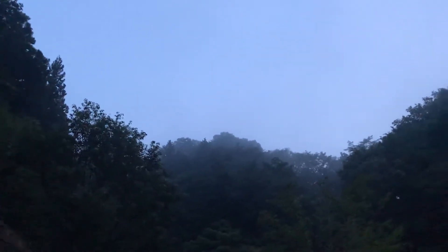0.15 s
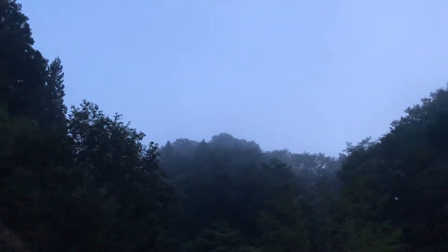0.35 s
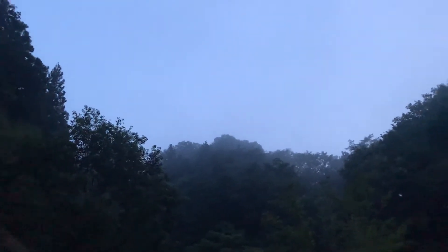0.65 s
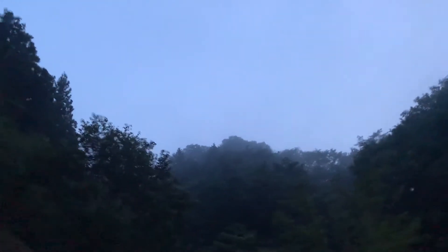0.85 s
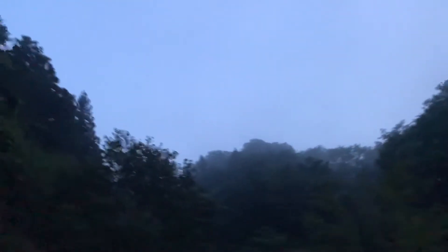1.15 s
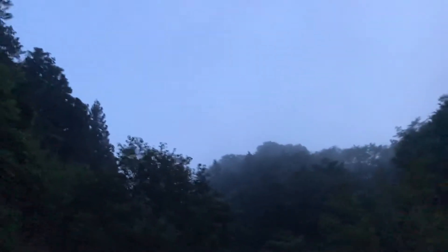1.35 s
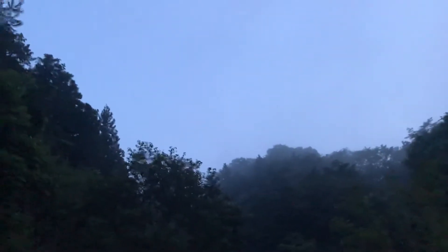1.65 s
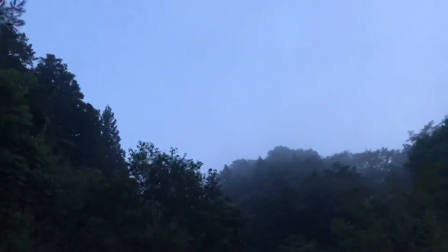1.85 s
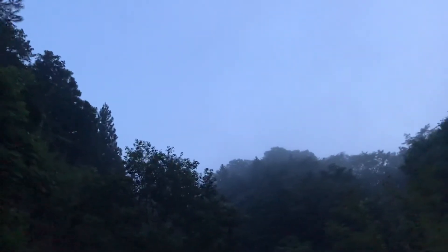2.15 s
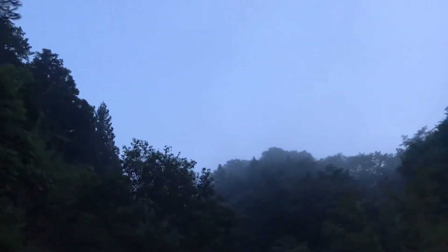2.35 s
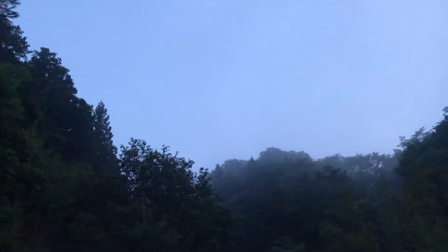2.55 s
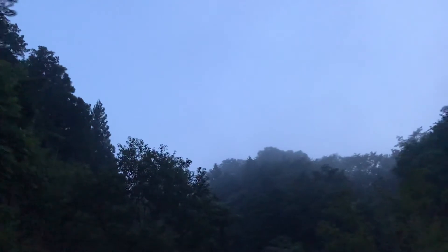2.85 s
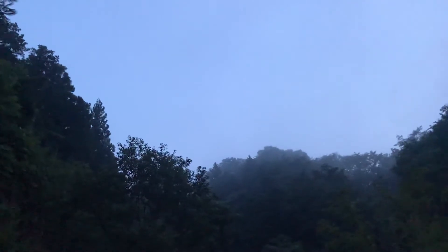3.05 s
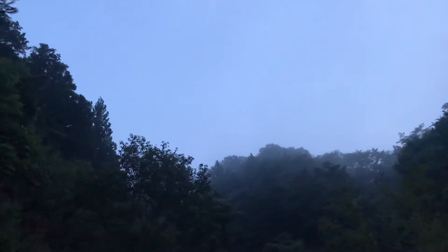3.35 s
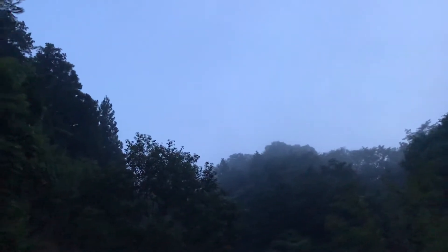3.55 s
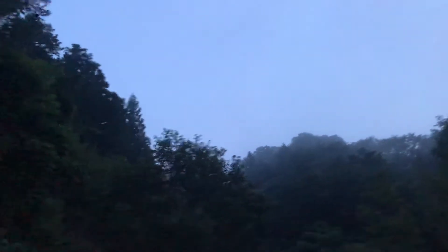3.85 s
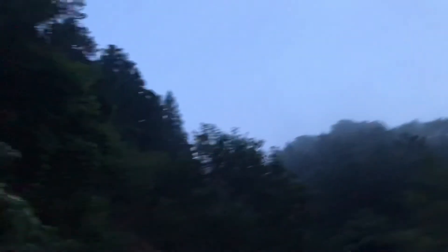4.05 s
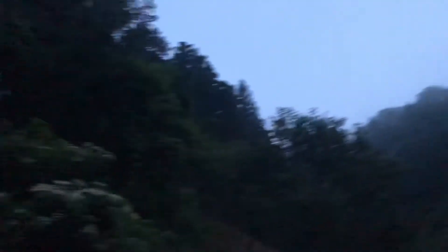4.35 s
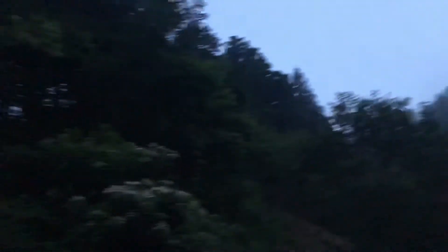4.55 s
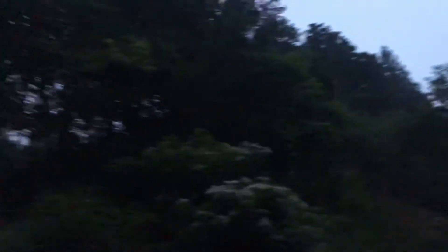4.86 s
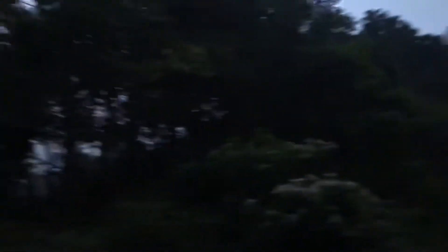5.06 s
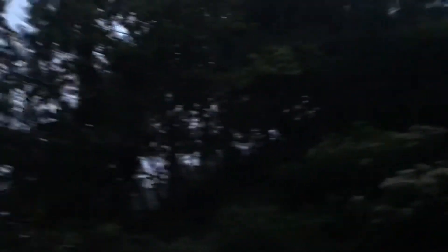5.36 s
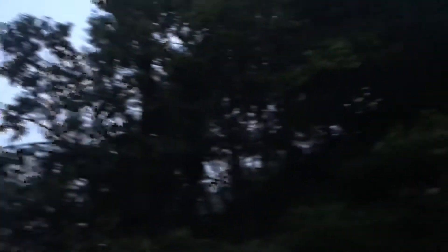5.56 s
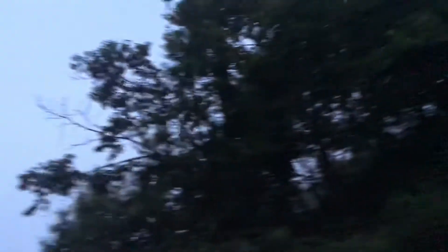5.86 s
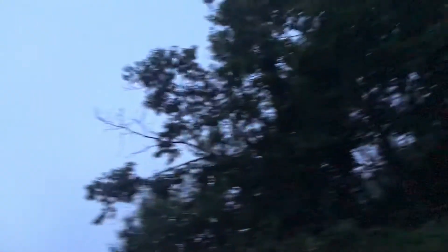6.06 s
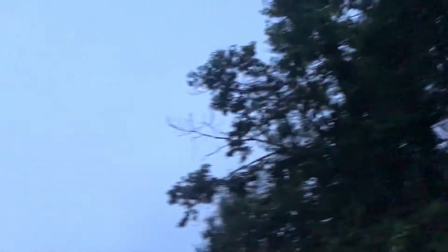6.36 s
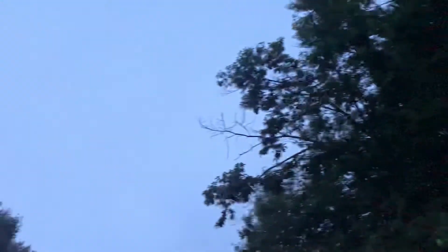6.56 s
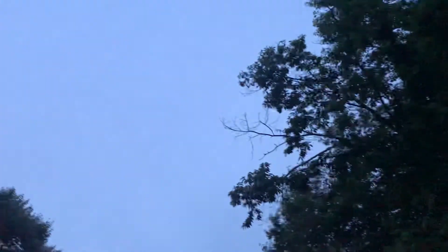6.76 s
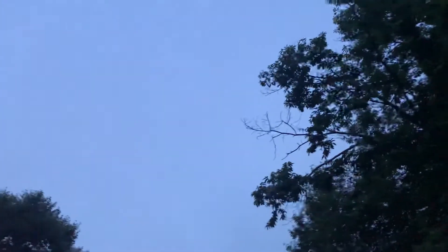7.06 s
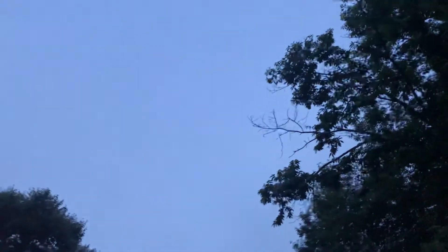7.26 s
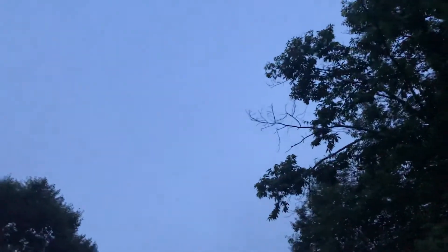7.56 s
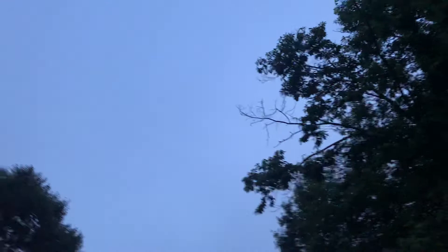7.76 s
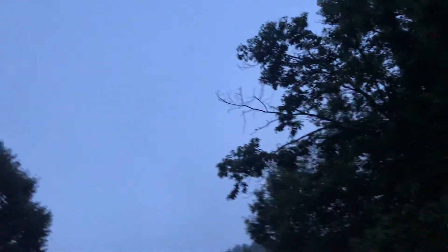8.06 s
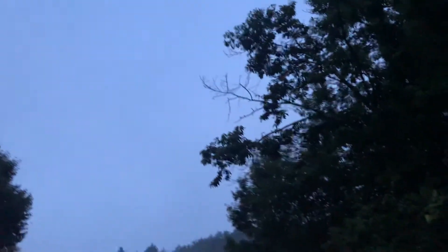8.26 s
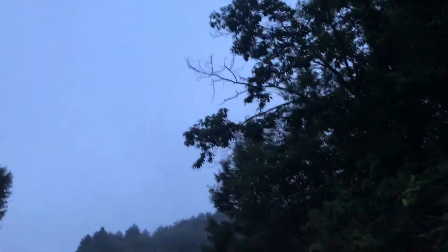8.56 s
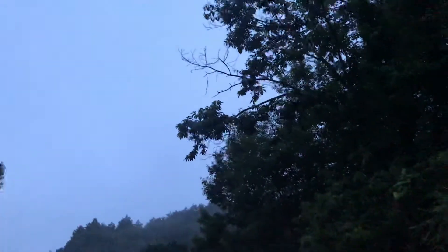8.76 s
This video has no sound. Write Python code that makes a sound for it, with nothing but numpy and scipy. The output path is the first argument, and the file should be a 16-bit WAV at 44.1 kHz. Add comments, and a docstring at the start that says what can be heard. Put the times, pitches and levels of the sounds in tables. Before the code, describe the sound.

Two near cicadas ring in fast pulsing trills, then falter into scattered chirps and trail off over a far cicada chorus with faint bird pipes.

```python
"""Two near cicadas in a wooded valley at evening ring at about eight chirps a second, then slow, sink and trail off.
Each chirp is a burst of tymbal clicks: a harmonic stack for the ring, a filtered ragged series for the rasp.
A far chorus sums eight such click series, blurred by the trees; smaller cicadas buzz steadily, as shaped
noise and repeated click waveforms. Birds pipe and slur faintly as gliding sines, and shaped noise makes the
valley's rumble, rush and hiss. Noise echoes scatter the larger cicadas and the birds among the trees."""
import sys
import numpy as np
from scipy import signal
from scipy.fft import rfft, irfft, next_fast_len
from scipy.io import wavfile
from scipy.ndimage import map_coordinates

SR = 44100
rng = np.random.default_rng(int(sys.argv[2]) if len(sys.argv) > 2 else 0)


def master(y):
    """Save y as 16-bit WAV."""
    cut = np.clip(np.atleast_2d(y).T, -1, 1)
    pcm = np.round(cut * 32767)  # scale
    wavfile.write(sys.argv[1], SR, pcm.astype(np.int16))


N = 392931


def amp(db):
    """Level definition: decibels to an amplitude ratio."""
    return 10 ** (np.asarray(db) / 20)


def unit(x):
    """Normalisation: x scaled to an rms of 1."""
    return x / np.sqrt(np.mean(x ** 2) + 1e-20)


def along(points, hz):
    """Logarithmic frequency scale: (f/Hz, value) points interpolated along it."""
    f, v = np.transpose(points)
    return np.interp(np.log(hz + 1), np.log(f + 1), v)


def curve(rows):
    """Linear interpolation: (t/s, value) rows as one value per sample."""
    return np.interp(np.arange(N) / SR, *np.transpose(rows))


def wobble(rate, size=N):
    """Band-limited randomness: a smooth curve through chance knots, rate of them a second."""
    knots = rng.standard_normal(int(size * rate / SR) + 4)
    return map_coordinates(knots, [np.arange(size) * rate / SR], order=2)


def filtered(x, response):
    """Linear filtering: the spectrum of x times a response of frequency."""
    m = next_fast_len(N + SR // 2)
    return irfft(rfft(x, m) * response(np.fft.rfftfreq(m, 1 / SR)), m)[:N]


def coloured(x, spectrum):
    """Spectral shaping: x filtered by (f/Hz, level/dB) points, at rms 1."""
    return unit(filtered(x, lambda hz: amp(along(spectrum, hz))))


def noise(spectrum):
    """Shaped noise: white noise given a spectrum, at rms 1."""
    return coloured(rng.standard_normal(N), spectrum)


def add(track, s, sound):
    """Superposition: mix a sound into a track at time s."""
    part = track[max(round(s * SR), 0):][:len(sound)]
    part += sound[:len(part)]


def tymbal(hz, stroke_hz, sag, jitter, depth):
    """Phase and amplitude modulation: each muscle stroke buckles a run of ribs that slows as it goes.

    sag and jitter are in radians, depth is the level swing in dB either way."""
    size = len(hz)
    stroke_rate = stroke_hz * (1 + 0.0705 * wobble(70, size))
    stroke = 2 * np.pi * (np.cumsum(stroke_rate) / SR + rng.random())
    phase = 2 * np.pi * np.cumsum(hz) / SR + sag * np.sin(stroke) + jitter * wobble(620, size)
    uneven_db = 1.35 * wobble(750, size)
    return phase, unit(amp(uneven_db - depth * np.cos(stroke)))


# Reverberation time of the trees and hillside: f/Hz, t60/s
TAIL_T60 = [(500, 0.59), (3000, 3.25), (5000, 2.3), (10000, 1.8), (16000, 0.097)]


def forest(x, scatter_db, tail_db):
    """Scattering and reverberation: near trunks answer first; in the hillside's tail the treble dies first."""
    hz, t, z = signal.stft(rng.standard_normal(SR), SR, nperseg=256)
    decay = amp(-60 * t / along(TAIL_T60, hz)[:, None])
    tail = signal.istft(z * decay, SR, nperseg=256)[1][:SR]
    scatter = rng.standard_normal(SR) * amp(-60 * np.arange(SR) / SR / 0.14)  # t60 0.14 s
    echo = (amp(scatter_db) * unit(scatter) + amp(tail_db) * unit(tail)) / np.sqrt(SR)
    delayed = np.pad(echo, (150, 0))  # 3.4 ms
    return x + signal.fftconvolve(x, delayed)[:N]


# Far singers: click rate f/Hz, chirp rate/Hz, level/dB relative to one another
SINGERS = [(2219, 7.8, -2.5), (2110, 7.4, -0.5), (2166, 8.3, 0.5), (2089, 6.6, 0), (2139, 7, -4),
           (2102, 5.7, -4.5), (2195, 8.6, -4), (1981, 6.2, -8)]
# Course of the far chorus: t/s, level/dB
CHORUS = [(0, -45), (.4, -46), (1, -41.5), (1.6, -41), (2.4, -44), (4.5, -44), (5.7, -47), (7.8, -47),
          (8.91, -48)]
# Response of the far singers' hollow abdomen, heard through the trees: f/Hz, level/dB
ABDOMEN = [(1400, -18), (1780, -5.5), (2180, -8), (2500, -6), (3300, 6), (3850, 4.5), (4400, -1),
           (4800, 5.5), (6400, -9), (8500, -2.5), (9600, -17), (10800, -21.5), (11400, -22.5)]


def far_cicadas():
    """Incoherent superposition: singers at their own pitches and chirp rates, blurred by the trees."""
    song = np.zeros(N)
    for hz, rate, db in SINGERS:
        beat = np.cumsum(rate * (1 + 0.02992 * wobble(.5))) / SR + rng.random()
        chirps = np.maximum(np.sin(2 * np.pi * beat), 0) ** 2
        # the pitch rises and falls within each chirp
        arch = 0.00793 * np.sin(2 * np.pi * beat) + .004 * wobble(18)
        drift = .004 * wobble(.8)
        pitch = hz * (1 + arch + drift)
        phase, strength = tymbal(pitch, stroke_hz=170, sag=.18, jitter=.15, depth=2.6)
        phase = (phase % (2 * np.pi)).astype(np.float32)
        harmonics = sum(np.sin(k * phase) for k in range(1, 6))
        vigour_db = .8 * wobble(1.2)
        song += amp(db + vigour_db) * chirps * strength * harmonics
    blurred = forest(song, scatter_db=-5.5, tail_db=-2)
    return amp(curve(CHORUS)) * coloured(blurred, ABDOMEN)


# Body resonance of the smaller cicadas: f/Hz, relative level/dB
BUZZ = [(2940, -44), (5000, -20.5), (5420, -35), (6190, -20), (6740, -5.5), (7510, 1.5), (7910, 4),
        (8870, -2.5), (9250, -6.5), (10200, -23.5), (11000, -24), (11900, -41), (13300, -29), (15500, -61)]
# The smaller cicadas that stand out: click rate f/Hz, level/dB relative to one another
BUZZERS = [(349, -4), (453, -2), (554, 0), (214.5, -30)]


def small_cicadas():
    """Periodic excitation of a resonator: a few click trains among the hiss of many more."""
    trains = np.zeros(N)
    for hz, db in BUZZERS:
        click_rate = hz * (1 + .0008 * wobble(2) + 0.001047 * wobble(40))
        cycle = np.cumsum(click_rate) / SR % 1
        ring = rng.standard_normal(round(SR / hz))  # every click rings the body alike
        clicks = map_coordinates(ring, [cycle * len(ring)], mode="grid-wrap")
        trains += amp(db + 1.9 * wobble(1.33)) * clicks
    hiss = amp(-49.5 + 0.17 * wobble(3.0)) * noise(BUZZ)
    return hiss + amp(-56.5) * coloured(trains, BUZZ)


# Spectrum of the valley's rumble: f/Hz, relative level/dB
AIR = [(15, -54), (25, -29), (43, -4.5), (60, 1.5), (86, -2.5), (125, 0), (156, -9.5), (240, -12.5),
       (394, -16.5), (468, -20), (605, -18.5), (796, -20.5), (1400, -24.5), (1500, -66), (1950, -36),
       (3300, -120)]
# Course of the distant rush, before a cut of 3.5 dB: t/s, level/dB
RUSH = [(0, -69), (.5, -65), (1.35, -64.5), (1.5, -74), (5.6, -74), (6.1, -69.5), (7.9, -69.5),
        (8.3, -71.5), (8.91, -69)]


def valley():
    """Broadband noise: low rumble, a distant rush of changing level and a faint even hiss."""
    rush_spectrum = [(90, -8.5), (200, -0.5), (350, -3.5), (600, -15.5), (1500, -42)]
    hiss_spectrum = [(500, -53), (1500, -1.5), (3200, 0.5), (6000, 8.0), (15000, -7.0)]
    rush = amp(curve(RUSH) - 3.5) * noise(rush_spectrum)
    hiss = amp(-63) * noise(hiss_spectrum)
    return amp(-66) * noise(AIR) + rush + hiss


def swell(t, attack, length, release):
    """Amplitude envelope: ease in, hold, die away exponentially (release is the time constant)."""
    ease_in = np.sin(np.pi / 2 * np.clip(t / attack, 0, 1)) ** 2
    return ease_in * np.exp(-np.maximum(t - length, 0) / release)


def trill(course, gap_s, slowing_s):
    """Slowing rhythm: each gap is a little longer than the last; pitch and strength follow the course."""
    s, *controls = np.transpose(course)
    gaps = gap_s + slowing_s * np.arange(40)
    starts = s[0] + np.cumsum(np.append(0, gaps))
    return [(at, CHIRP_S, *(np.interp(at, s, c) for c in controls)) for at in starts[starts <= s[-1]]]


# Steady trills of the two near cicadas: t/s, click rate f/Hz, abdomen ring level/dB, rib sizzle level/dB
HIGH_TRILL = [(.172, 2140, -51, -71), (.3, 2183, -45, -67), (.6, 2276, -41.5, -54), (.78, 2261, -42.5, -51),
              (1.25, 2223, -37.5, -52.5), (2.8, 2217, -42, -57), (3.92, 2168, -47, -50)]
LOW_TRILL = [(.875, 2190, -33, -50), (1.12, 2170, -38, -44.5), (1.62, 2159, -35.5, -46.5),
             (2.5, 2148, -33.5, -46.5), (2.9, 2134, -38, -47.5)]
# Loose chirps as singers join in, fall out of step and trail off:
# t/s, length t/s, click rate f/Hz, ring level/dB, sizzle level/dB
LOOSE_CHIRPS = [(.54, 0.035, 2060, -50, -61), (.675, 0.024, 2087, -46.5, -56),
                (.785, 0.029, 2120, -42, -53), (2.99, 0.034, 2127, -42, -48),
                (3.028, 0.033, 2135, -36, -49), (3.113, 0.031, 2130, -44, -48),
                (3.162, 0.038, 2142, -39, -48.5), (3.238, .024, 2138, -47, -48),
                (3.29, 0.058, 2130, -40, -49.5), (3.35, 0.036, 2136, -46, -49.5),
                (3.466, 0.042, 2140, -43, -47), (3.628, 0.026, 2142, -43, -43.5),
                (3.765, 0.017, 2122, -43, -47.5), (3.812, .028, 2120, -42, -48),
                (3.905, 0.019, 2113, -43, -47.5), (4.029, 0.043, 2110, -43, -48.5),
                (4.131, 0.039, 2102, -38.5, -50), (4.18, 0.036, 2138, -42.5, -46),
                (4.328, 0.055, 2160, -47, -49), (4.478, 0.034, 2089, -42, -50.5),
                (4.567, 0.044, 2160, -39, -51.5), (4.645, 0.039, 2077, -46.5, -50.5),
                (4.805, 0.045, 2098, -42, -49), (5.012, .037, 2087, -46, -49.5),
                (5.065, .029, 2162, -38, -49), (5.29, .037, 2080, -45, -51.5),
                (5.392, 0.045, 2150, -40.5, -52), (5.609, 0.03, 2080, -41.5, -50.5),
                (5.8, 0.054, 2085, -47, -65), (5.96, 0.027, 2072, -45.5, -52.5),
                (6.368, 0.028, 2070, -46, -54)]
# First and second harmonic, against the ring: level/dB
RING_DB = [-9.5, 0]
# Fifth to seventh harmonic, against the sizzle: level/dB
SIZZLE_DB = [-2, -17.5, -20.5]
# Fourth harmonic, brought out by hard chirps: sizzle level/dB, harmonic level/dB against the sizzle
FOURTH = [(-51, -2.5), (-51.5, 8.5)]
# Response of the rasp of the buckling ribs: f/Hz, level/dB
RASP = [(1300, -23), (1620, -12), (1770, -1), (1900, -18), (2400, -4), (3300, -7.5), (4000, 1), (5200, 6),
        (6200, 4.5), (8200, 5.5), (10400, -4), (12300, -7.5), (13600, -15), (15000, -17)]
# first gap between chirps, and how much longer each next gap is
HIGH_GAP_S, HIGH_SLOWING_S = .1172, .00074
LOW_GAP_S, LOW_SLOWING_S = .1158, .00125
CHIRP_S, ATTACK_S, RELEASE_S = 0.045, .024, 0.0072  # trill chirp length; attack of the first harmonic
# pitch: share it starts flat, time constant of the rise, share lost a second
SCOOP, SCOOP_S, DROOP_PER_S = .02, 0.0048, 0.078
COLOUR_SCATTER_DB = 1.18  # each harmonic differs by chance from chirp to chirp


def near_cicadas():
    """Harmonic synthesis: bursts of tymbal clicks, a ringing stack over a slower, ragged rasp."""
    song, rasp = np.zeros(N), np.zeros(N)
    t = np.arange(int(.13 * SR)) / SR
    low = trill(LOW_TRILL, LOW_GAP_S, LOW_SLOWING_S)
    high = trill(HIGH_TRILL, HIGH_GAP_S, HIGH_SLOWING_S)
    for s, length, hz, ring_db, sizzle_db in LOOSE_CHIRPS + low + high:
        # a quick scoop up, then a slow droop
        pitch = hz * (1 - DROOP_PER_S * (t - length / 2) - SCOOP * np.exp(-t / SCOOP_S))

        phase, strength = tymbal(pitch, stroke_hz=150, sag=.11, jitter=.045, depth=.9)
        third_db = (ring_db + sizzle_db) / 2 - 2.5
        # the rows descend, so this is a step: sizzle above the last row takes its level
        fourth_db = sizzle_db + np.interp(sizzle_db, *np.transpose(FOURTH))
        levels = [*np.add(ring_db, RING_DB), third_db, fourth_db, *np.add(sizzle_db, SIZZLE_DB)]
        # high partials speak sooner; the low ring of the abdomen builds up more slowly
        for k, db in enumerate(levels, 1):
            colour = amp(COLOUR_SCATTER_DB * rng.standard_normal())
            partial = np.sqrt(2) * colour * np.sin(k * phase + rng.uniform(0, 2 * np.pi))
            envelope = swell(t, attack=ATTACK_S / np.sqrt(k), length=length, release=RELEASE_S)
            add(song, s, amp(db) * partial * strength * envelope)

        phase, strength = tymbal(pitch * .977, stroke_hz=270, sag=.18, jitter=.17, depth=2.2)
        clicks = unit(sum(np.sin(k * phase + rng.uniform(0, 2 * np.pi)) for k in range(1, 8)))
        grit = .36 * rng.standard_normal(len(t))
        scrape = strength * swell(t, attack=0.015, length=length + 0.0047, release=0.026)
        add(rasp, s - .008, amp(sizzle_db + 5.5) * scrape * (clicks + grit))
    return song + filtered(rasp, lambda hz: amp(along(RASP, hz)))


def whistle(glide, warble_hz):
    """Frequency modulation: one bird note along a pitch glide, loudest two thirds through, at rms 1."""
    u = np.linspace(0, 1, len(glide))
    hz = glide + warble_hz * wobble(450, len(u))
    push = np.sqrt(np.abs(np.sin(np.pi * u ** 1.75)))
    return unit(push * np.sin(2 * np.pi * np.cumsum(hz) / SR))


# A bird's arched piping: t/s, crest f/Hz, level/dB
PIPES = [(1.245, 3240, -67), (1.6, 3415, -62.5), (2.895, 2940, -67), (3.54, 2960, -62.5),
         (4.06, 3020, -59.5), (4.486, 3400, -58.5), (5.3, 2935, -63.5), (6.153, 2950, -64.5),
         (6.745, 2970, -62.5), (7.26, 3400, -64.5)]
# Buzzy slurs of other birds: t/s, length t/s, start f/Hz, end f/Hz, level/dB
SLURS = [(0.362, 0.04, 3700, 2400, -68), (2.045, 0.063, 3670, 2700, -71), (6.327, 0.029, 5000, 4170, -55),
         (6.62, .045, 5200, 4420, -62), (6.743, 0.041, 5230, 4350, -59), (7.215, .045, 4370, 5250, -66),
         (7.385, .04, 4470, 5250, -66), (7.66, .085, 4750, 4830, -65), (7.748, 0.078, 3900, 2600, -70),
         (8.35, 0.29, 5250, 5420, -64.5)]
# a usual pipe note and its length; higher ones last longer by this power
PIPE_HZ, PIPE_S, PIPE_STRETCH = 3004, 0.0663, 2.6
# shares below the crest at start and end; unsteadiness of pitch
PIPE_RISE, PIPE_DROP, PIPE_WARBLE_HZ = .085, 0.11, 22
SLUR_WARBLE_HZ, SLUR_FLUTTER_DB = 100, 3  # unsteadiness of pitch and level


def birds():
    """Gliding tones: thin pipes rise to a crest and drop away; buzzy slurs go straight up or down."""
    song = np.zeros(N)
    for s, crest_hz, db in PIPES:
        length = PIPE_S * (crest_hz / PIPE_HZ) ** PIPE_STRETCH
        u = np.linspace(0, 1, int(length * SR))
        arch = 1 - PIPE_RISE * np.maximum(1 - u / .7, 0) ** 1.6 - PIPE_DROP * u ** 14
        add(song, s, amp(db) * whistle(crest_hz * arch, PIPE_WARBLE_HZ))
    for s, length, start_hz, end_hz, db in SLURS:
        glide = np.geomspace(start_hz, end_hz, int(length * SR))
        flutter_db = SLUR_FLUTTER_DB * wobble(57, len(glide))
        add(song, s, amp(db + flutter_db) * whistle(glide, SLUR_WARBLE_HZ))
    return song


def scene():
    """Superposition: all the singers and the valley, on one channel."""
    near = forest(near_cicadas(), scatter_db=-16.5, tail_db=-11)
    piping = forest(birds(), scatter_db=-14, tail_db=-9)
    return (near + far_cicadas() + small_cicadas() + piping + valley())[None]


TOP_HZ = 15720


def record(dry):
    """Ideal low-pass filtering: nothing passes from the band limit upwards."""
    return np.array([filtered(channel, lambda hz: hz < TOP_HZ) for channel in dry])


dry = scene()
out = record(dry)
master(out)
```